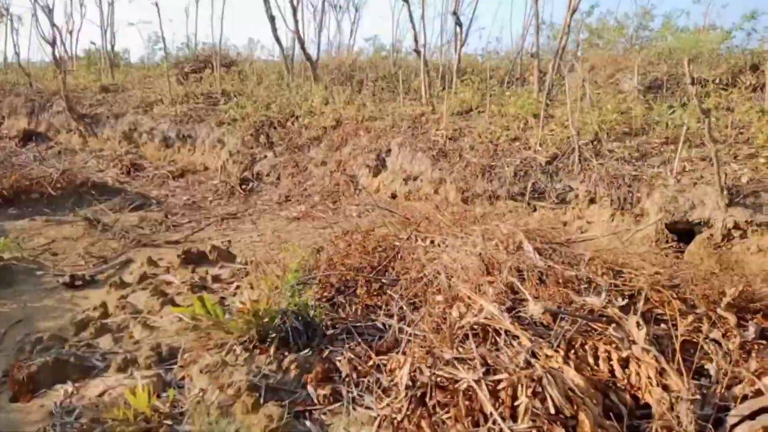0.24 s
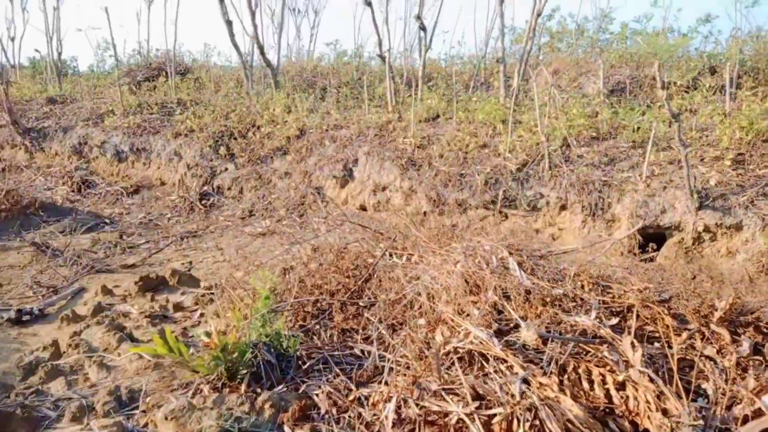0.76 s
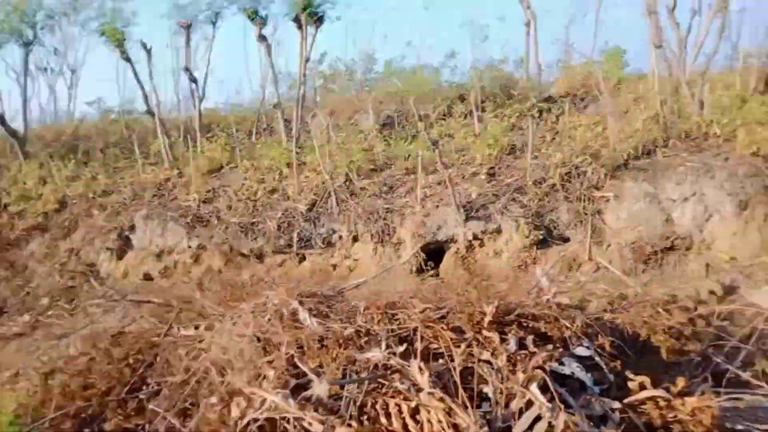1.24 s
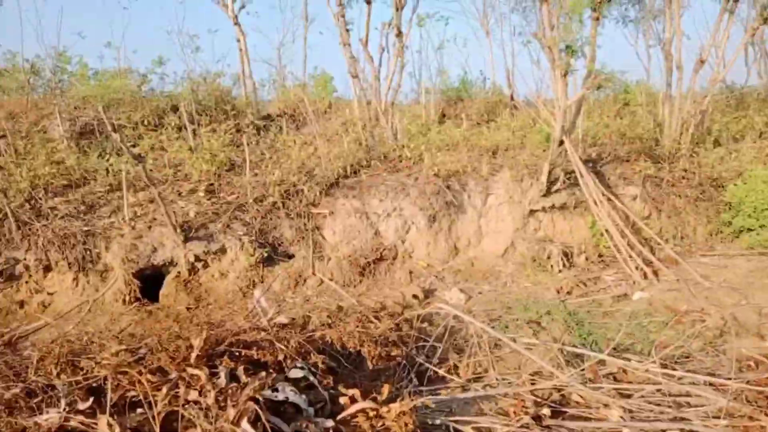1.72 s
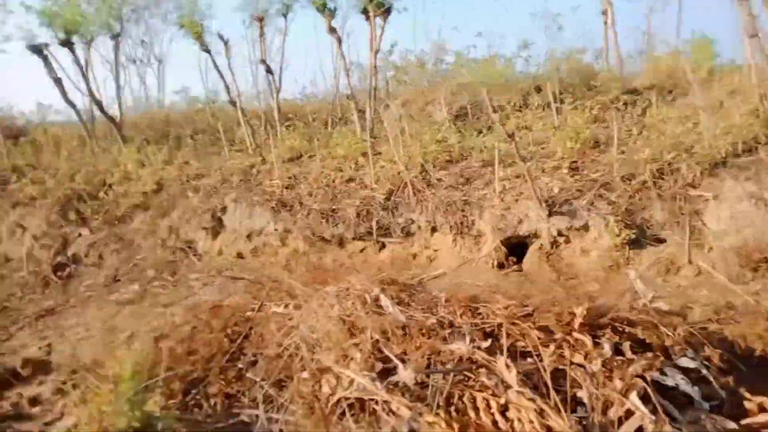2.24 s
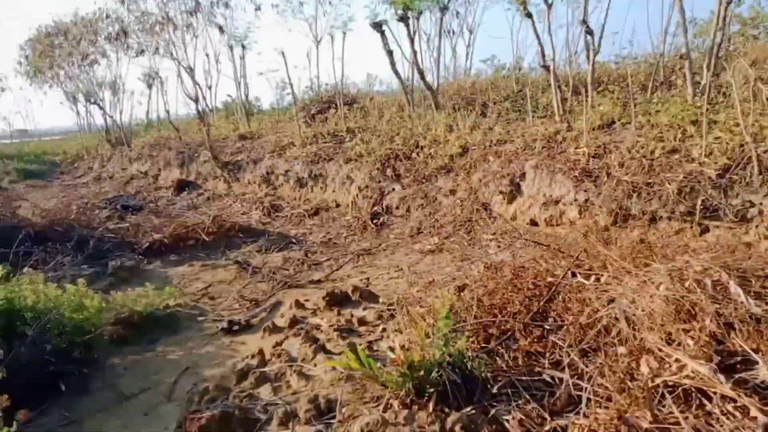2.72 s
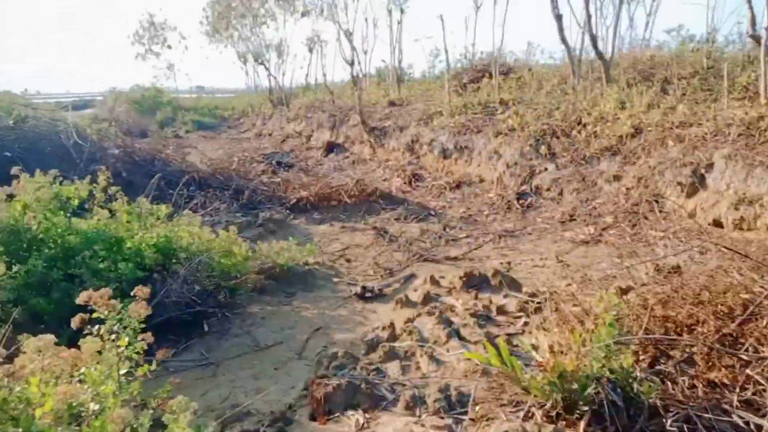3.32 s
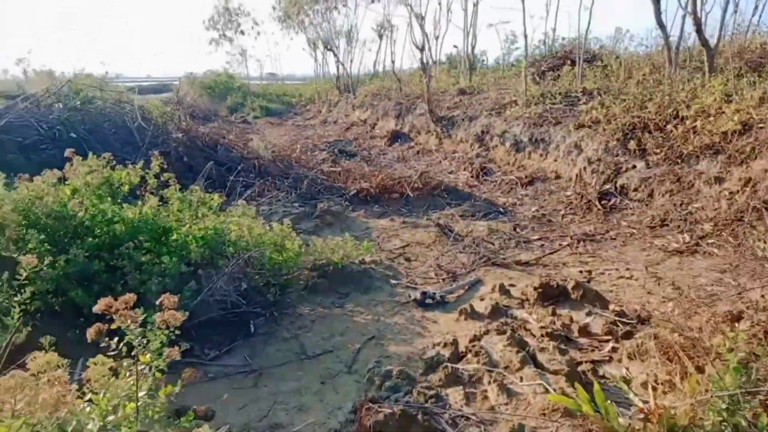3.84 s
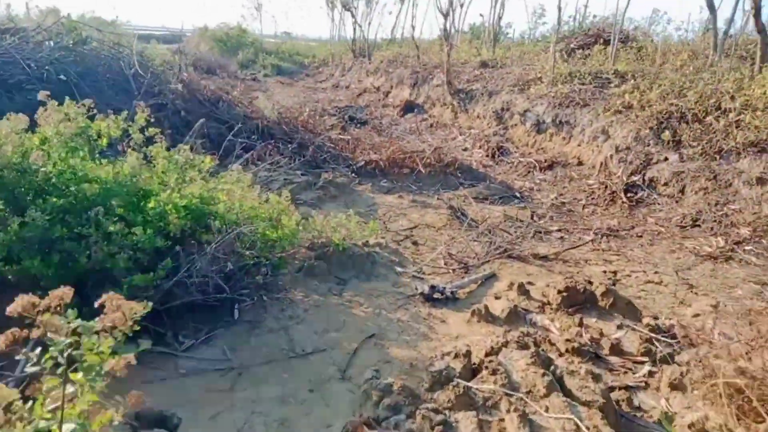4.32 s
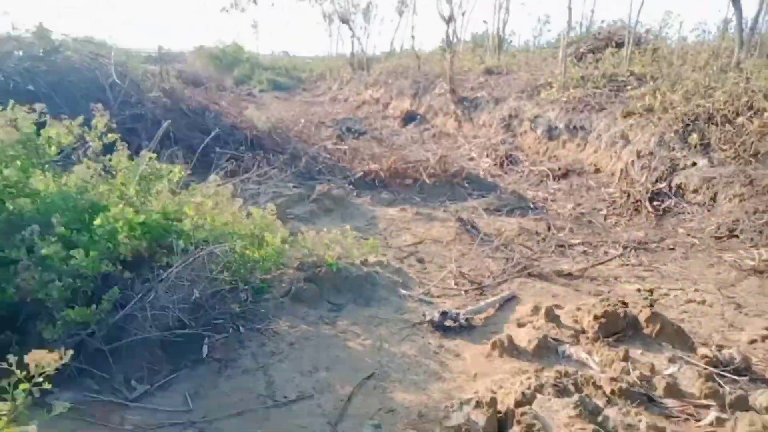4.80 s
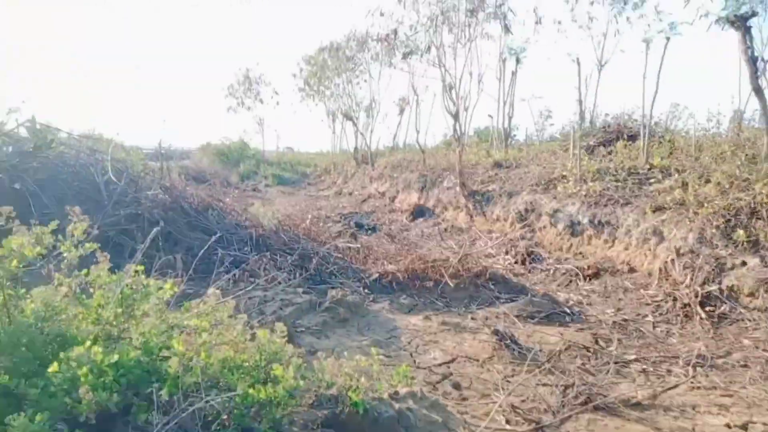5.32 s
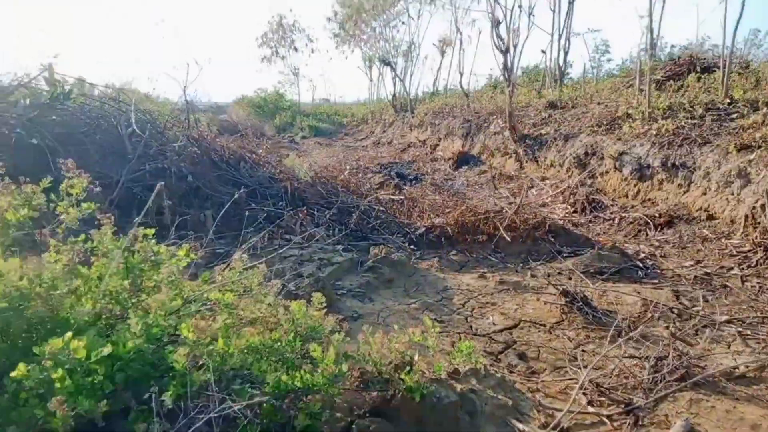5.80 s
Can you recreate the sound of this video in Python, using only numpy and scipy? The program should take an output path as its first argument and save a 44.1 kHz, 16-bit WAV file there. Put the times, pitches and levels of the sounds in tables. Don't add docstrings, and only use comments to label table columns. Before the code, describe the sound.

An open scrubby field beside a night heron colony, heard through a handheld microphone with faint hiss. From the start to about 5.8 s, herons trade short nasal honks, each around a tenth of a second, rising quickly and drooping, some overlapping. Behind them a distant colony chatters and croaks in rough uneven bouts, stronger around 1.3 s and 5.4 s. Tiny high whistles of small birds flick past, with a clearer falling one near 5.5 s. A brief crunch and knock come at 0.2 s and a faint step near 0.9 s. Wind puffs at 1.3 s grow into deep, heavy thumping from 2.0 to 3.3 s, then weaken, with another thump around 4.2 s. A sharp twig crack at 3.2 s leads into soft crushing steps and swishing stalks from 3.5 s, again at 4.4 and 5.0 s; snaps and a clustered dull knock close things near 5.7 s.

```python
import sys
import numpy as np
from scipy import signal
from scipy.fft import rfft, irfft, next_fast_len
from scipy.io import wavfile
from scipy.ndimage import uniform_filter1d

SR = 44100
rng = np.random.default_rng(int(sys.argv[2]) if len(sys.argv) > 2 else 0)


def how_loud(loudness_db):
    steps = np.asarray(loudness_db, float) / 20
    return 10 ** steps


def wav_record(signal):
    frames = np.transpose(np.atleast_2d(signal))
    bounded = np.clip(frames, -1, 1)
    quanta = np.round(bounded * 32767).astype(np.int16)
    wavfile.write(sys.argv[1], SR, quanta)


N = 267069


def rms_one(x):
    return x / np.sqrt(np.mean(x ** 2) + 1e-20)


def in_time(rows):
    s, *columns = np.transpose(rows)
    return [np.interp(np.arange(N) / SR, s, c) for c in columns]


def at_hz(points, hz):
    points_hz, points_db = np.transpose(points)
    return np.interp(np.log(hz), np.log(points_hz), points_db)


def drift(rate):
    r = np.exp(-80 * np.pi * rate / SR)
    noise = rng.standard_normal(N // 40 + 2002)
    slow = rms_one(signal.lfilter([1], [1, -2 * r, r * r], noise)[2000:])
    return np.interp(np.arange(N) / 40, np.arange(len(slow)), slow)


def resonate(x, hz, width_hz):
    r = np.exp(-np.pi * width_hz / SR)
    zeros = np.array([1, 0, -1]) * (1 - r * r) / 2
    return signal.lfilter(zeros, [1, -2 * r * np.cos(2 * np.pi * hz / SR), r * r], x + 1e-18)


def coloured(x, spectrum, patchy_db, rate, count=2):
    size = next_fast_len(N)
    hz = np.arange(size // 2 + 1) * SR / size + 1
    whole = rfft(x, size) * how_loud(at_hz(spectrum, hz))
    lowest_hz, highest_hz = spectrum[0][0], spectrum[-1][0]
    last = int(count * np.log2(highest_hz / lowest_hz))
    place = np.clip(count * np.log2(hz / lowest_hz), 0, last)
    out = np.zeros(N)
    for k in range(last + 1):
        band = irfft(whole * np.clip(1 - abs(place - k), 0, 1), size)[:N]
        out += band * how_loud(patchy_db * drift(rate))
    return rms_one(out)


def glide(rows, smooth_s):
    s, hz, db = np.transpose(rows)
    t = np.arange(s[0], s[-1], 1 / SR)
    hz, db = (uniform_filter1d(np.interp(t, s, c), int(smooth_s * SR) + 1) for c in (hz, db))
    fade = np.clip(np.minimum((t - s[0]) / 0.002, (s[-1] - t) / 0.014), 0, 1)
    return round(s[0] * SR), hz, db, fade


def add(out, start, x):
    out[start:start + len(x)] += x[:N - start]


def swells(rows, calm, bend):
    t = np.arange(0, N + 32, 32) / SR
    level = np.interp(t, *np.transpose(calm))
    for s, db, swell_ms, ebb_ms in rows:
        distance = 1000 * np.maximum((s - t) / swell_ms, (t - s) / ebb_ms)
        level = np.maximum(level, db - 20 * distance ** bend)
    return np.interp(np.arange(N) / SR, t, level)


def hiss():
    # (frequency [Hz], level [dB])
    hiss_spectrum = [(450, 15), (1000, 8), (5000, 0), (9000, -6), (15700, -6.5)]
    return how_loud(-76.5) * coloured(rng.standard_normal(N), hiss_spectrum, patchy_db=.4, rate=6)


def colony(pulse_hz=190, rough=1.0):
    # (time [s], peak level [dB], swell [ms], ebb for 20 dB [ms])
    croak_bouts = [(.28, -55, 130, 800), (1.24, -50, 400, 395), (1.36, -47, 400, 325), (1.7, -55, 93, 294),
                   (2.59, -53, 380, 554.5), (3.05, -74, 130, 475), (3.5, -54.5, 180, 400),
                   (3.78, -59, 350, 603), (4.48, -53.5, 190, 170), (4.72, -53, 450, 173),
                   (5.14, -50.5, 120, 105), (5.36, -45.5, 110, 416), (5.92, -58, 700, 92)]
    # (frequency [Hz], width [Hz], level [dB])
    croak_throat = [(1466, 406, 5.5), (2020, 680, 2), (3600, 1240, -15.5)]
    # (time [s], level [dB])
    bustle_levels = [(0, -67), (.23, -64), (.58, -66), (.85, -66.5), (1.82, -64), (2.07, -74.5),
                     (2.59, -66), (3.05, -65), (3.33, -69), (3.5, -63), (4.15, -64), (4.28, -73.5),
                     (4.72, -65.5), (5.01, -65), (5.25, -66.5), (5.36, -60), (5.7, -62), (6.04, -67.5)]
    # (frequency [Hz], density [dB per Hz])
    chatter_spectrum = [(600, -34.5), (1100, -4.5), (1600, -11), (2400, 3.5), (3600, 0.5), (4500, -8.5),
                        (5300, -16), (7500, -25.5), (11000, -39)]
    croak_db = swells(croak_bouts, [(0, -83)], bend=1.1)
    chatter_db, = in_time(bustle_levels)
    cycles = np.cumsum(pulse_hz * how_loud(1.6 * drift(25))) / SR
    pulses = np.diff(np.floor(cycles), prepend=0) * how_loud(1.2 * rng.standard_normal(N))
    source = rms_one(pulses) + rough * rng.standard_normal(N)
    croak = np.zeros(N)
    for k, (hz, width, db) in enumerate(croak_throat):
        once = resonate(source, hz, 1.08 * width)
        croak += (-1) ** k * how_loud(db) * resonate(once, hz, 1.08 * width)
    wash = coloured(rng.standard_normal(N), chatter_spectrum, patchy_db=5, rate=8, count=9)
    lumps_db = 2.5 * drift(12)
    return how_loud(croak_db - 7 + lumps_db) * rms_one(croak) + how_loud(chatter_db) * wash


def field(x, t60_s=0.18, scatter_db=-23, bank_s=0.0713, bank_db=-30):
    t = np.arange(round(t60_s * SR)) / SR
    tail = rng.standard_normal(len(t)) * how_loud(-60 * t / t60_s) * np.clip(t / 0.14, 0, 1)
    tail = resonate(tail, 3400, 6800)
    bank = np.exp(-((t - bank_s) / .022) ** 2) * tail
    response = how_loud(scatter_db) * tail / np.sqrt(np.sum(tail ** 2))
    response += how_loud(bank_db) * bank / np.sqrt(np.sum(bank ** 2))
    return signal.fftconvolve(x, response)[:N]


def gusts():
    # (time [s], peak level [dB], swell [ms], ebb for 20 dB [ms])
    gust_rows = [(.215, -50, 25, 64), (1.29, -28, 23, 89), (1.467, -34, 83, 51), (2.0, -22, 47.5, 181.5),
                 (2.17, -22, 10.5, 24.5), (2.25, -27, 170, 32), (2.35, -33.5, 300, 55),
                 (2.424, -19, 25.3, 32.5), (2.645, -28, 230, 64), (2.734, -16, 23, 30.5),
                 (2.875, -24, 76, 88.5), (2.98, -18, 52, 153), (3.16, -17.5, 94, 73.5),
                 (3.285, -25.5, 165, 32), (3.45, -37, 930, 145), (3.58, -30.5, 39, 122),
                 (3.806, -30, 56, 75), (3.89, -32.5, 39, 54), (4.05, -41, 155, 448), (4.26, -35.5, 220, 89),
                 (4.34, -39, 45, 91), (4.555, -50, 260, 239), (4.944, -47.5, 310, 362),
                 (5.218, -43.5, 110, 119), (5.33, -41.5, 39, 146), (5.55, -54, 64, 600)]
    # (time [s], level [dB])
    breeze_levels = [(0, -56.5), (1.2, -57.5), (1.9, -59.5), (4.7, -61), (6.06, -63)]
    return swells(gust_rows, breeze_levels, bend=1.56)


def wind(level_db, bright_db=1.05, puff_db=-3):
    # (frequency [Hz], density [dB per Hz])
    eddy_spectrum = [(25, -43.5), (50, -9), (85, 1), (140, -4.5), (200, -10.5), (340, -35), (500, -60),
                     (900, -79.5), (1600, -110)]
    # (time [s], peak level [dB], frequency [Hz])
    thump_rows = [(0.202, -34, 126), (0.325, -42, 121), (0.885, -56, 141), (1.274, -39, 129),
                  (1.28, -50, 103), (1.394, -29, 87), (1.451, -29, 110), (1.928, -28, 96.9),
                  (1.984, -27, 84), (2.078, -13.5, 116), (2.161, -9.5, 131), (2.246, -16, 125),
                  (2.348, -25.5, 119), (2.313, -24, 122), (2.405, -26, 98), (2.552, -20, 103.5),
                  (2.627, -16.5, 139), (2.724, -5.5, 101), (2.835, -16.5, 132), (2.873, -12, 159),
                  (2.957, -15.5, 137), (3.075, -12, 130), (3.153, -4.5, 159), (3.39, -23.5, 127),
                  (3.568, -30, 118), (3.806, -22.5, 108.4), (3.876, -23.5, 129), (4.024, -26, 62.5),
                  (4.095, -28, 84.6), (4.21, -15, 106), (4.265, -14.5, 127), (4.546, -31.5, 103),
                  (4.93, -29, 105), (4.994, -33, 123), (5.04, -31, 80.7), (5.104, -38, 90),
                  (5.164, -34, 64), (5.212, -28.5, 80), (5.317, -30, 119), (5.541, -36, 81.5),
                  (5.61, -37.5, 114), (5.884, -45.5, 125)]
    noise = rng.standard_normal((2, N))
    light = coloured(noise[0], eddy_spectrum, patchy_db=2.0, rate=12.7)
    fast = resonate(resonate(noise[1], 252.5, 150), 255, 150)
    fast = rms_one(resonate(fast, 190, 140)) * how_loud(3 * drift(30))
    fast_db = -10.5 + bright_db * (level_db + 23)
    out = how_loud(level_db - 0.5) * (light + how_loud(fast_db) * fast)
    for s, db, hz in thump_rows:
        turns = np.arange(round(4 * SR / hz)) * hz / SR
        bell = np.exp(-((turns - .8) / np.where(turns < .8, .45, 1.1)) ** 2)
        add(out, round(s * SR), how_loud(db + puff_db) * bell * np.sin(2 * np.pi * turns ** 1.042))
    return signal.sosfilt(signal.butter(1, 45, "high", fs=SR, output="sos"), out)


def far_rumble():
    # (time [s], level [dB])
    rumble_levels = [(0.0, -68), (1.36, -56), (1.53, -83), (1.99, -72), (2.14, -56), (2.44, -69),
                     (3.08, -50), (3.27, -64), (4.41, -72), (4.6, -66), (5.07, -78), (5.58, -57),
                     (5.75, -71), (6.05, -82)]
    # (frequency [Hz], level [dB])
    rumble_spectrum = [(200, 6), (300, 16.5), (420, -1.5), (560, 8), (750, -29.5)]
    level_db, = in_time(rumble_levels)
    drone = coloured(rng.standard_normal(N), rumble_spectrum, patchy_db=3, rate=8.7, count=4)
    return how_loud(level_db - 14.0) * drone


def small_birds():
    # (time [s], frequency [Hz], level [dB])
    whistle_tables = [
        [(.118, 7200, -78), (.126, 6500, -70), (.134, 5460, -41)],
        [(.17, 5200, -61), (.21, 7700, -99), (.235, 7300, -72), (.278, 4960, -67)],
        [(1.835, 5450, -72.5), (1.86, 6300, -74), (1.87, 6200, -88)],
        [(2.308, 7660, -72), (2.316, 6160, -69), (2.328, 5530, -78)],
        [(2.342, 6100, -77), (2.352, 6500, -71), (2.4, 7650, -73), (2.425, 7240, -74), (2.475, 5030, -74)],
        [(2.596, 6900, -77), (2.603, 6600, -72), (2.612, 5000, -75)],
        [(3.306, 7850, -66), (3.313, 5900, -70), (3.322, 4340, -57)],
        [(5.425, 4000, -71), (5.445, 4700, -67), (5.482, 4720, -53.5), (5.495, 4300, -49), (5.508, 3140, -28)],
        [(3.935, 4950, -57.5), (3.96, 5250, -67), (4.03, 5260, -84)],
        [(5.1, 4330, -77), (5.15, 5050, -69)],
        [(2.772, 3250, -60), (2.782, 3100, -60), (2.80, 3070, -54)],
        [(2.64, 2297, -61), (2.662, 2480, -55.5), (2.69, 2370, -53)],
        [(2.65, 4100, -73.5), (2.72, 3980, -67)],
        [(2.59, 4180, -67), (2.645, 3840, -60)],
        [(1.205, 574, -58), (1.26, 523, -62)],
        [(1.37, 655, -64), (1.45, 510, -59)],
    ]
    out, flutter = np.zeros(N), drift(70)
    for rows in whistle_tables:
        start, hz, db, fade = glide(rows, smooth_s=0.0024)
        level = how_loud(db + 4.5 * flutter[start:start + len(hz)])
        add(out, start, fade * level * np.sin(2 * np.pi * np.cumsum(hz) / SR))
    return out


def crushed_stalks(rows, spectrum, count, grains_per_s=1500, spread_db=4.6):
    t, press = np.arange(N) / SR, np.zeros(N)
    for start, end, db in rows:
        press += how_loud(db) * np.clip((t - start) / 0.019, 0, 1) * np.clip((end - t) / 0.031, 0, 1)
    born = rng.random(N) < grains_per_s * how_loud(5 * drift(30)) / SR
    sizes = how_loud(spread_db * np.minimum(rng.exponential(1, N), 5))
    grains = born * sizes * rng.choice([-1, 1], N)
    source = rms_one(grains) + .7 * rng.standard_normal(N)
    crackle = coloured(source, spectrum, patchy_db=3, rate=25, count=count)
    return press * how_loud(1.5 * drift(16)) * crackle


def footsteps():
    # (start [s], end [s], level [dB])
    step_rows = [(0.193, 0.247, -39.5), (0.875, 1.03, -55), (3.01, 3.076, -61), (3.47, 3.61, -55.5),
                 (3.672, 3.874, -57), (4.372, 4.564, -54.5), (4.935, 5.03, -55.5), (5.326, 5.442, -62.5),
                 (5.427, 5.735, -59), (5.679, 5.796, -51), (5.873, 5.995, -69)]
    # (frequency [Hz], density [dB per Hz])
    brush_spectrum = [(300, 5.5), (450, 1.5), (1050, 1.5), (1800, -3.5), (3200, -7), (5500, -23),
                      (9000, -33.5), (12000, -61.5)]
    return crushed_stalks(step_rows, brush_spectrum, count=3)


def stalk_swishes():
    # (start [s], end [s], level [dB])
    swish_rows = [
        (3.45, 3.9, -64.5),
        (4.36, 4.56, -57.5),
        (4.99, 5.17, -55),
        (5.42, 5.7, -63),
    ]
    # (frequency [Hz], density [dB per Hz])
    stalk_spectrum = [(700, -12.5), (1300, 2), (3200, 0), (5500, -21.5), (9000, -27.5), (12000, -51.5)]
    return crushed_stalks(swish_rows, stalk_spectrum, count=2)


def snaps(decay_s=.0013):
    # (time [s], crack 5.5-10 kHz [dB], ring under 2 kHz [dB], ring 2-5 kHz [dB], tick over 12 kHz [dB])
    twig_rows = [(0.596, -52.5, -45, -52, -79.5), (2.726, -63, -62, -67, -65), (3.02, -65, -47, -55, -82),
                 (3.2333, -48.5, -39, -34.5, -59), (3.58, -72, -42, -63, -87), (3.614, -75, -54, -65, -90),
                 (3.752, -70, -48, -56, -97), (3.782, -68, -46, -55, -91), (4.953, -65, -69, -45, -92),
                 (4.997, -55, -68, -60, -80), (5.145, -71, -43, -62, -92), (5.1633, -80, -40.5, -58, -91),
                 (5.353, -75, -38, -46, -92), (5.359, -70, -38, -48, -92), (5.4724, -84, -37.5, -39.5, -89),
                 (5.543, -66, -62, -54, -87.5), (5.5942, -76, -77, -38, -86), (5.614, -71, -41, -53, -88),
                 (5.622, -64, -52, -47, -89.5), (5.68, -52.5, -57, -38.5, -55),
                 (5.932, -69, -42.5, -65, -101), (5.938, -70, -47.5, -66, -89)]
    # (time [s], peak level [dB], frequency [Hz])
    knock_rows = [(0.209, -16, 1017), (1.998, -32.5, 480), (2.022, -44, 520), (2.075, -46, 420),
                  (2.167, -43.5, 500), (4.416, -31, 1060), (4.946, -44, 350), (5.717, -26.5, 1110),
                  (5.719, -31, 450), (5.723, -27, 830), (5.731, -33, 566), (5.739, -42.5, 490),
                  (5.75, -38, 1140), (5.727, -25, 690), (5.743, -25, 626), (5.746, -25, 925),
                  (5.933, -40, 1094)]
    out, t = np.zeros(N), np.arange(800) / SR
    ranges_hz = [5500, 10000], [700, 2000], [2000, 5000], [12000, 15600]
    bands = [signal.butter(4, edges, "band", fs=SR, output="sos") for edges in ranges_hz]
    for s, *dbs in twig_rows:
        crack = rng.standard_normal(len(t)) * np.exp(-t / decay_s)
        rings = [signal.sosfilt(band, crack) for band in bands]
        add(out, round(s * SR), sum(how_loud(db) * ring / abs(ring).max() for db, ring in zip(dbs, rings)))
    for s, db, hz in knock_rows:
        knock = t / 0.0049 * np.exp(-t / 0.00086) * np.sin(2 * np.pi * hz * t)
        add(out, round(s * SR), how_loud(db + 20.0) * knock)
    return out


def flares():
    # (time [s], frequency [Hz], level [dB])
    flare_tables = [
        [(1.092, 3270, -51), (1.118, 3830, -58)],
        [(1.742, 3470, -52), (1.76, 3870, -47.5), (1.785, 4240, -60)],
        [(1.742, 2730, -48), (1.76, 3100, -52), (1.785, 3150, -66)],
        [(2.476, 3160, -48.5), (2.492, 3616, -45), (2.515, 3920, -63.5)],
        [(2.478, 2620, -57), (2.51, 3100, -53)],
    ]
    out = np.zeros(N)
    for rows in flare_tables:
        start, hz, db, fade = glide(rows, smooth_s=.006)
        add(out, start, fade * how_loud(db + 4) * np.sin(2 * np.pi * np.cumsum(hz) / SR))
    return out


def arch(start, length, top_hz, db, climb_ms, sag, fade_db, first_share, sag_bend, attack_db):
    t, climb = np.linspace(0, length, num=24), climb_ms / 1000
    before = np.clip(1 - t / climb, 0, 1)
    after = np.clip((t - climb) / (length - climb), 0, 1)
    rise = (1 - np.clip(first_share, .5, .9)) * before ** 2.2
    droop = sag / 100 * np.tanh(2.2 * after ** max(sag_bend, 1.5)) / np.tanh(2.2)
    level_db = db - attack_db * before ** 3.8 - fade_db * after ** 2.03
    return np.transpose([start + t, top_hz * (1 - rise - droop), level_db])


def partial_strengths(order, hz, db, voice, dip_hz, throat_width_hz=450, ground=0.65, dulling_db=7.0):
    # (frequency [Hz], level [dB])
    beak_spectrum = [(560, -4), (720, 0), (1500, 0), (2700, 2.5), (4300, -9.5), (5800, -20.5), (8000, -17)]
    low_db, throat_hz, edge_hz, throat_db, throat_follows = voice
    top, place, partial_hz = hz.argmax(), np.arange(len(hz)), order * hz
    throat_hz = throat_hz * np.where(place > top, hz / hz.max(), 1) ** throat_follows
    lift_db = throat_db / (1 + ((partial_hz - throat_hz) / throat_width_hz) ** 2)
    shape = how_loud(at_hz(beak_spectrum, partial_hz) + lift_db)
    shape /= np.sqrt(1 + np.minimum((partial_hz / edge_hz) ** 24, 300.0))
    shape *= abs(1 + ground * np.exp(1j * np.pi * partial_hz / dip_hz))
    fallen = np.maximum(place - top, 0.64 * (top - place)) / SR / 0.035
    shape *= how_loud(-dulling_db * fallen * np.clip(order - 5, 0, None))
    shape /= np.sqrt(np.sum(shape[2:] ** 2, axis=0))
    after_top = np.where(place > top, .4, -1.2)
    lows_db = low_db - 7.5 + after_top * (db[top] - db)
    shape[:2] = how_loud(lows_db + at_hz(beak_spectrum, partial_hz[:2]))
    return shape


def herons(shimmer_db=2.0, hoarse_ms=8.6, lows_late_ms=21.2, breath_db=-24, waver=0.005):
    # (start [s], length [s], top pitch [Hz], level of the upper partials [dB])
    honk_rows = [(0.046, 0.17, 912, -52.5), (0.156, 0.11, 819, -47), (0.471, 0.15, 819, -51),
                 (0.712, 0.11, 900, -53.5), (1.007, 0.14, 811, -42.5), (1.085, 0.16, 798, -56),
                 (1.376, 0.098, 900, -56.5), (1.652, 0.1, 825.5, -52), (1.726, 0.14, 822, -53),
                 (1.902, 0.1, 905, -54.5), (2.193, 0.16, 841, -44), (2.398, 0.1, 910, -52),
                 (2.475, 0.12, 804, -52), (2.848, 0.13, 816, -45.5), (3.042, 0.1, 915, -51),
                 (3.172, 0.13, 790, -50), (3.368, 0.13, 801, -42.5), (3.387, 0.099, 917, -50.5),
                 (3.868, 0.095, 919, -48), (4.035, 0.14, 812, -42), (4.33, 0.087, 915, -43.5),
                 (4.387, 0.12, 792, -46.5), (4.606, 0.14, 772.6, -42.5), (5.004, 0.15, 777.5, -48),
                 (5.265, 0.12, 923, -48.5), (5.706, 0.1, 909, -43), (3.941, 0.045, 912, -52.5)]
    # (climb [ms], sag [%], fade [dB], first pitch [share of top], roundness of the sag [1])
    arch_rows = [(40.4, 12.1, 46, 0.59, 0.95), (44.3, 19.9, 16, 0.7, 1.72), (45, 2.9, 25, 0.69, 1.22),
                 (31, 2.9, 20, 0.69, 1.02), (34.8, 26.6, 27, 0.73, 1.54), (48.4, 5.2, 13, 0.74, 1.42),
                 (47.3, 3.44, 1, 0.62, 1.0), (42.6, 15.5, 2, 0.97, 1.87), (57.3, 5.6, 31, 0.68, 1.23),
                 (51.3, 11.4, 4, 1, 1.8), (34.3, 35, 25.5, 0.69, 1.74), (45.2, 12.2, -6, 0.74, 1.8),
                 (58.6, 15, 15, 0.95, 3.1), (51.3, 20, 14.5, 0.66, 1.3), (35.2, 11.5, 7, 0.59, 1.9),
                 (52.6, 20.3, 23, 0.76, 4.0), (41.5, 23, 15, 0.93, 2.6), (52.7, 31.9, 8, 0.25, 0.78),
                 (44.9, 12.5, -8, 0.48, 2.1), (42.8, 27.6, 19, 0.5, 1.32), (44.3, 5.7, -10.5, 0.55, 3.8),
                 (44.2, 15, 21.5, 0.87, 4.6), (48, 19.3, 19.5, 0.74, 1.33), (50.6, 8.2, 30, 0.85, 1.0),
                 (48.2, 13.4, 15, 0.37, 2.27), (47.9, 4.5, 21, 1, 2.2), (37.8, 3.4, 4, 0.87, 1.7)]
    # (two lowest partials [dB], throat resonance [Hz], edge of the bright range [Hz],
    # throat lift [dB], how far the throat follows the sag [exponent])
    voice_rows = [(-0.2, 3970, 5800, 11, 3), (-6, 4300, 6500, 10.5, 1.3), (-0.5, 3570, 3500, 13, -2),
                  (3.5, 3300, 5100, 9, -2), (-9, 3730, 5700, 20, 2.25), (1, 1400, 3560, 3, -2),
                  (0, 4300, 4900, 10, 3), (4, 4380, 8100, 20, 0.5), (0.5, 2900, 5000, 6, 2.2),
                  (2, 4400, 6780, 10.5, 1), (-4.5, 3720, 7100, 10.5, 0.8), (0.5, 3530, 6600, 14.5, 1.3),
                  (3, 2800, 4000, 6.5, 12.5), (-2, 4050, 6200, 8.5, 1.9), (-1, 4220, 8100, 23.5, 1.6),
                  (1.5, 3200, 4100, 14.5, 4), (-1.5, 4400, 6600, 7, 5.5), (0, 4120, 5500, 22, 1.4),
                  (-2, 4000, 7100, 10, 1.5), (-4, 3850, 6500, 12, 1.1), (-5, 3930, 5650, 19, 0.1),
                  (-2, 3700, 3430, 18, 6), (-3, 3580, 5500, 16.5, 1.4), (3, 2930, 3400, 15, 2.5),
                  (5, 4620, 6200, 7.5, 3), (1.5, 4050, 5600, 22, 1), (-0.5, 2500, 3300, 15, 1)]
    ground_dips = [(2900.0), (1740), (2570), (2740), (2450), (2600), (2750), (1700.0), (2120), (2530),
                   (2480), (2900), (1660), (2720), (2520), (2330), (2320), (1970.0), (2460), (2510), (2600),
                   (2460.0), (2760), (2680), (2480), (2620), (2400)]
    attack_levels = [14, 14, 0, 26, 37, 7, -5, 0, -1, -2, 17, 11.5, 5.5, 8, -2.5, 5.5, 7.5, 7, 4, 7, 22.5,
                     -6, 13, 8, 10, 17, 9]
    puff_levels = [3, 3, 0, 1, 0, -10, 0, 4.5, 8, 3.5, 1, -1, 0, -1, 2, 2.5, 2, -4, 3, 0.5, 0, -5, 0, -12,
                   8, -1, -6]
    # (frequency [Hz], density [dB per Hz])
    breath_spectrum = [(700, -12), (1500, 3), (3300, 2), (4600, -12), (5600, -14.5), (7500, -14),
                       (10000, -48)]
    # (frequency [Hz], width [Hz], level [dB])
    gulp_throat = [(2340, 840, -1), (4300, 1700, 1.5)]
    out, flutter = np.zeros(N), drift(60)
    air = coloured(rng.standard_normal(N), breath_spectrum, patchy_db=2, rate=30)
    order, sway = np.arange(1, 11)[:, None], drift(18)
    gulp = 0.24 * air
    for hz, width, db in gulp_throat:
        gulp = gulp + how_loud(db) * resonate(resonate(air, hz, width), hz, width)
    gulp = rms_one(gulp)
    settle_ms = np.where(order > 2, hoarse_ms, lows_late_ms / np.sqrt(order))
    calls = zip(honk_rows, arch_rows, voice_rows, ground_dips, attack_levels, puff_levels)
    for honk, bow, voice, dip_hz, attack_db, puff_db in calls:
        start, hz, db, fade = glide(arch(*honk, *bow, attack_db), smooth_s=.011)
        place = np.arange(len(hz))
        span, t = slice(start, start + len(hz)), place / SR
        hz = hz * (1 + waver * flutter[span])
        shape = partial_strengths(order, hz, db, voice, dip_hz)
        quick_db = shimmer_db * flutter[(start + 9001 * order + place) % N]
        slow_db = 2.2 * sway[(start + 7001 * order + place) % N]
        shape *= how_loud(quick_db + slow_db)
        shape *= 1 - np.exp(-(t * 1000 / settle_ms) ** 2)
        phase = order * 2 * np.pi * np.cumsum(hz) / SR + rng.uniform(0, 2 * np.pi, order.shape)
        tone = np.sum(shape * np.sin(phase), axis=0)
        age = t / 0.0047
        burst = 20.0 * how_loud(db[hz.argmax()] + puff_db) * age * np.exp(-age) * gulp[span]
        breath = how_loud(breath_db) * (how_loud(db) * air[span] + burst)
        add(out, start, fade * (how_loud(db) * np.sqrt(2) * tone + breath))
    return out


def scene():
    gust_db = gusts()
    birds = herons() + flares() + small_birds()
    near = footsteps() + stalk_swishes() + snaps() + wind(gust_db) + far_rumble()
    duck = how_loud(-0.64 * np.clip(gust_db + 28, 0, None))
    return (birds + duck * (field(birds) + colony()) + near)[None]


def low_pass(x):
    return signal.sosfilt(signal.butter(12, 15720, fs=SR, output="sos"), x)


def record(dry):
    mix = dry + hiss()
    return low_pass(mix)


dry = scene()
out = record(dry)
wav_record(out)
```